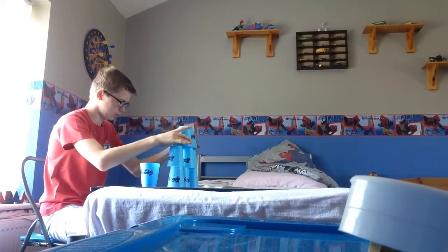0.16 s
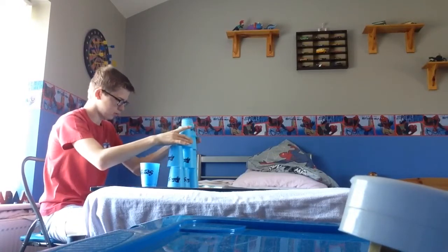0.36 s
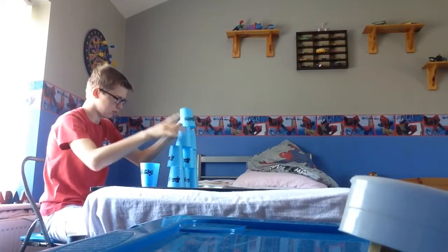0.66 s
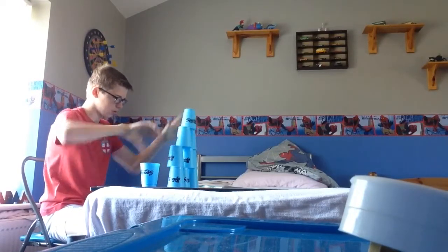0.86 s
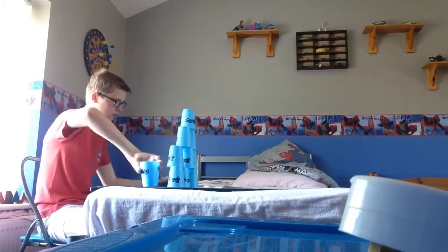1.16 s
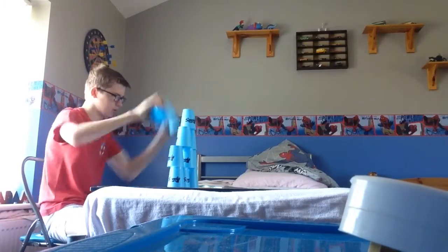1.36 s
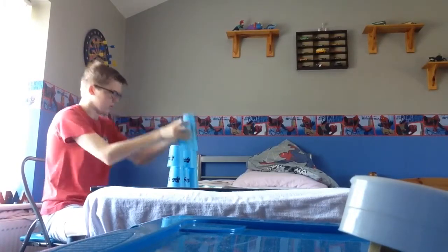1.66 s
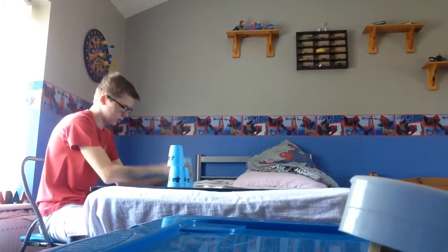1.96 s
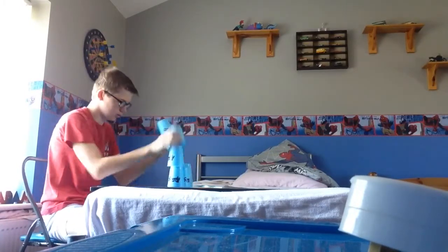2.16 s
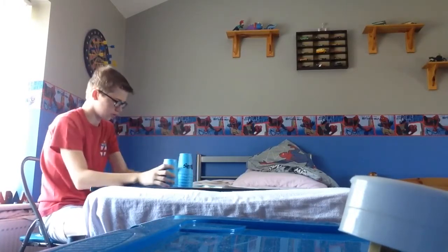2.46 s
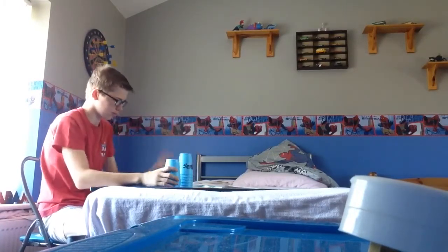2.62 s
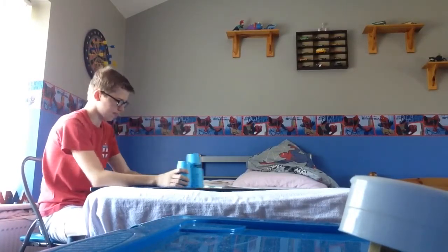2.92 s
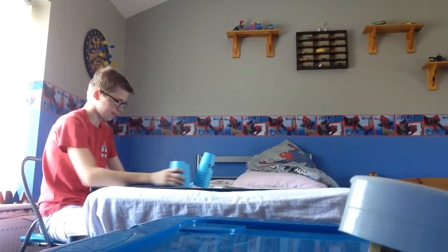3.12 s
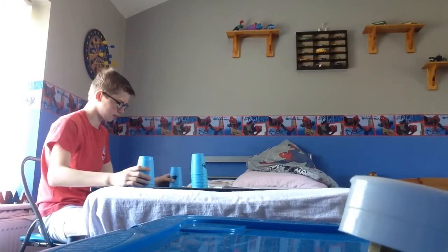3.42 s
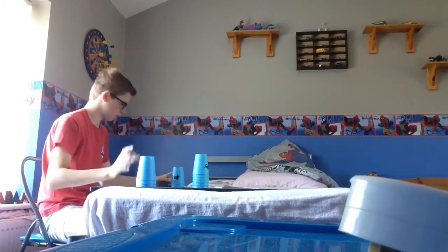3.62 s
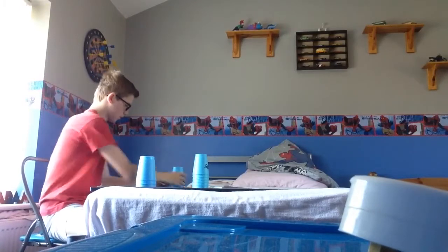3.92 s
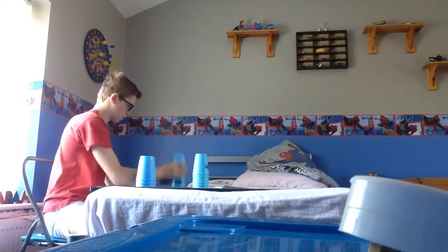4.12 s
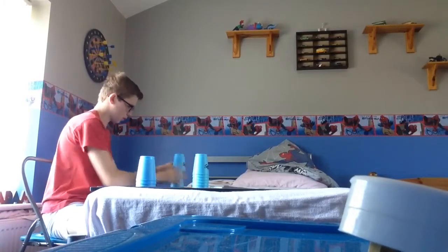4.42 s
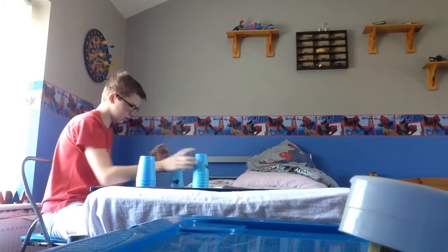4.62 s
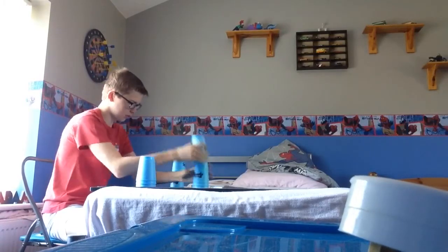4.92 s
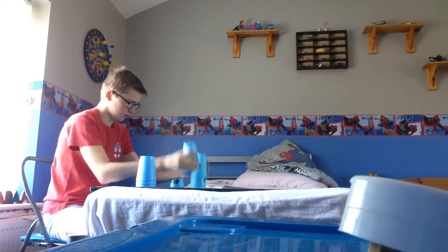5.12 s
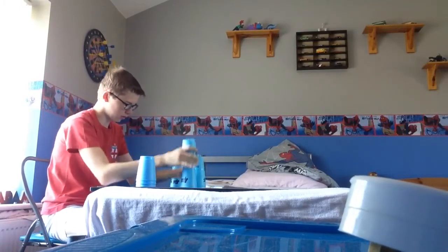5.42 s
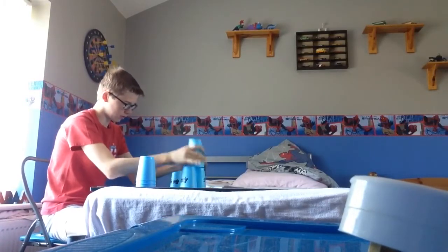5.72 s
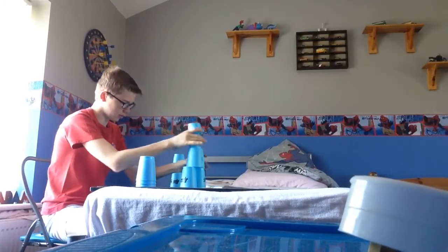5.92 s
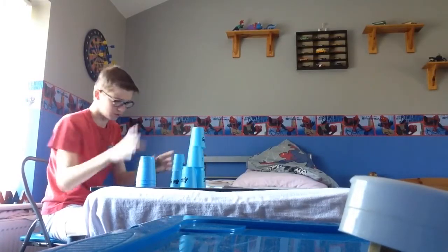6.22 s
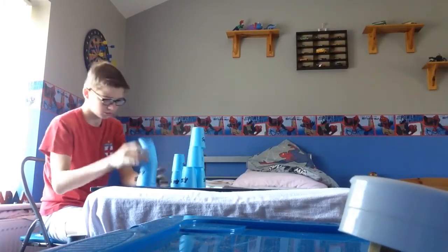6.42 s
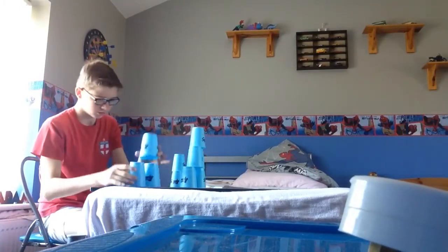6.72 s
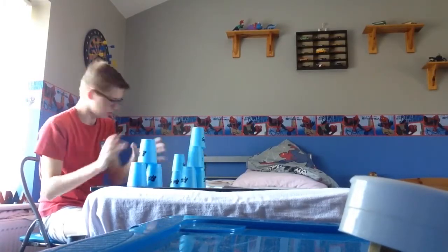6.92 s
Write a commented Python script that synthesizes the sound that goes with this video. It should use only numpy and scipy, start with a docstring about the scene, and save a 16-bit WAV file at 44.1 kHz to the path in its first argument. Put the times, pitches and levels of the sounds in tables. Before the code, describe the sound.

Quick hollow taps and brief sliding clatters of plastic cups being stacked and taken down indoors, with short pauses between.

```python
"""Plastic cups are stacked into pyramids and swept down on a soft-covered board in a small bedroom.
First come separate landings, each a brief chatter that rings the cups and the board. Near 2 s cups slide
and clatter. Around 3 s a dragged stack makes the board hum under soft knocks. From 4 s to the end come
more landings, slides and ticks of rim on rim. All along, the room echoes for a quarter second over a
faint hush, and a phone listens from a couple of metres away."""
import sys
import numpy as np
from scipy import signal
from scipy.fft import rfft, irfft
from scipy.io import wavfile
from scipy.ndimage import uniform_filter1d

SR = 44100
rng = np.random.default_rng(int(sys.argv[2]) if len(sys.argv) > 2 else 0)


def generate_wav(sig):
    """Save sig (samples, or channels by samples) to the path in sys.argv[1] as 16-bit PCM at SR."""
    pcm = np.round(np.clip(np.atleast_2d(sig).T, -1, 1) * 32767).astype(np.int16)
    wavfile.write(sys.argv[1], SR, pcm)


N = 311784


def undb(db):
    """Turn decibels into a number to multiply by."""
    return 10 ** (np.asarray(db) / 20)


def unit(x):
    """Scale a signal so its average size (rms) is 1."""
    return x / np.sqrt(np.mean(x ** 2))


def colour(x, points):
    """Turn lows and highs up or down along a curve of (pitch_hz, level_db) points."""
    hz, db = np.transpose(points)
    f = np.maximum(np.fft.rfftfreq(len(x), 1 / SR), 1)
    return irfft(rfft(x) * undb(np.interp(np.log(f), np.log(hz), db)), len(x))


HUSH_DB, HUSH_WAVER_DB = -65.5, 1.2
# The tone of the background hush: pitch_hz, relative_db
HUSH_TONE = [(15, -47), (25, -19), (122, -3.5), (273, -16.5), (700, -17.5), (1230, -29.5), (2680, -32),
             (3810, -32.5), (4470, -34.5), (7870, -39), (13800, -50.5), (15400, -48)]


def hush():
    """Still air and microphone noise, wavering a little."""
    waver = unit(uniform_filter1d(rng.standard_normal(N), SR // 5))
    return unit(colour(rng.standard_normal(N), HUSH_TONE)) * undb(HUSH_DB + HUSH_WAVER_DB * waver)


ECHO_DB, ECHO_RISE_S = 1.5, 0.013
# How long the room's echo takes to fade by 60 dB: pitch_hz, fade_s
ECHO_FADES = [(125, 0.24), (400, 0.2), (1100, 0.3), (3000, 0.28), (8000, 0.27)]


def room(sound):
    """The walls send back a blur of echoes; each range of pitch fades at its own speed."""
    t, tail = np.arange(SR // 2) / SR, 0
    hz, fade_s = np.transpose(ECHO_FADES)
    noise = rfft(rng.standard_normal(len(t)))
    log_hz = np.log(np.maximum(np.fft.rfftfreq(len(t), 1 / SR), 1))
    for k in range(len(hz)):
        band = np.interp(log_hz, np.log(hz), np.arange(len(hz)) == k)
        fade = 1000. ** (-t / fade_s[k])
        tail = tail + irfft(noise * band, len(t)) * fade / np.sqrt(np.sum(fade ** 2))
    return undb(ECHO_DB) * signal.fftconvolve(sound, tail * np.clip(t / ECHO_RISE_S, 0, 1))[:N]


# Swells of hum from the board: middle_s, pitch_hz, level_db, half_length_s
HUM_SWELLS = [(2.827, 190, -47.5, 0.0058), (2.964, 180, -46.5, 0.009), (3.012, 175, -44.5, 0.024),
              (3.262, 163, -44.5, .016), (3.308, 168, -42.5, 0.0037), (3.365, 168, -46.5, 0.024),
              (3.506, 165, -44.5, 0.01), (3.53, 168, -43, 0.021)]


def board_hum():
    """The rims of a dragged stack rub the board into one low note, with a weak note an octave up."""
    out, t = np.zeros(N), np.arange(-SR // 8, SR // 8) / SR
    for middle_s, hz, db, half_length_s in HUM_SWELLS:
        phase = 2 * np.pi * hz * (t + middle_s)
        note = np.sin(phase) + undb(-23) * np.sin(2 * phase)
        swell = np.exp(-(t / half_length_s) ** 2 / 2)
        start = int(middle_s * SR) - SR // 8
        out[start:start + len(t) - 1] += (undb(db) * swell * note)[1:]
    return np.sqrt(2) * out


RIM_BAND_HZ, RIM_RISE_S, RIM_FADE_S = (2800, 8300), 0.0023, 0.019
# Lone ticks of rim on rim: start_s, peak_db
RIM_TICKS = [(2.0896, -58.5), (2.244, -46), (2.3156, -41.5), (2.4299, -37), (2.904, -46), (4.1138, -52),
             (4.2685, -46.5), (4.843, -55), (4.9046, -51.5), (5.0044, -58.5), (5.1678, -60.5),
             (5.238, -35.5), (5.5304, -43), (6.7568, -48.5), (6.77, -47.5)]


def rim_ticks():
    """A short bright crack where two rims touch."""
    out, t = np.zeros(N), np.arange(SR // 20) / SR
    bright = signal.butter(2, RIM_BAND_HZ, "bandpass", fs=SR, output="sos")
    shape = (1 - np.exp(-t / RIM_RISE_S)) * 1000. ** (-t / RIM_FADE_S)
    for start_s, db in RIM_TICKS:
        crack = signal.sosfilt(bright, rng.standard_normal(len(t))) * shape
        start = int(start_s * SR)
        out[start:start + len(t)] += crack * undb(db) / np.abs(crack).max()
    return out


SLIDE_RISE_S, SLIDE_FALL_S = 0.085, 0.089
SLIPS_PER_S, SLIP_SPREAD_DB, LUMPS_PER_S, LUMP_DB = 3000, 1.6, 45, 2.5
SCRAPE_WIDTH_HZ, SCRAPE_DB, SCRAPE_CLIMB_HZ_PER_S = 350, 2, 2500
# The tone of a sliding cup's hiss: pitch_hz, relative_db
HISS_TONE = [(1470, -6), (2500, -16), (3240, -10.5), (3660, -12.5), (4390, -7.5), (6130, -11.5),
             (15400, -32)]
# Cups sliding on each other and on the cover: start_s, length_s, ring_db, scrape_db, hiss_db, scrape_hz
CUP_SLIDES = [(1.168, .12, -60.5, -77.5, -74, 2300), (1.656, .2, -36, -45.5, -46.5, 2310),
              (2.044, 0.09, -60.5, -79, -73, 2250), (2.28, 0.15, -47.5, -60.5, -56.5, 2570),
              (2.656, 0.156, -74, -73.5, -70.5, 2430), (2.87, .1, -62, -69, -68, 2300),
              (3.222, 0.3, -83, -77, -69.5, 2594), (3.644, 0.11, -79.5, -81.5, -88, 2138),
              (4.024, 0.16, -71, -77, -73, 2500), (4.833, 0.15, -71.5, -79, -84, 2320),
              (4.997, .11, -75, -82, -80, 2440), (6.349, 0.25, -63.5, -70.5, -68, 2355),
              (6.556, 0.12, -66, -69, -73.5, 2350), (6.758, 0.023, -56, -67, -69, 2400)]


def cup_slides():
    """Many tiny slips shake the cups and hiss; the scrape climbs in pitch as one cup enters another."""
    start_s, length_s, *levels_db, start_hz = np.transpose(CUP_SLIDES)[:, :, None]
    age_s = np.arange(N) / SR - start_s
    rise = np.clip(1 + age_s / SLIDE_RISE_S, 0, 1) ** 2
    fall = np.clip(1 - (age_s - length_s) / SLIDE_FALL_S, 0, 1) ** 2
    shape = rise * fall
    ring_gain, scrape_gain, hiss_gain = (np.sum(shape * undb(db), axis=0) for db in levels_db)
    pitches = start_hz + SCRAPE_CLIMB_HZ_PER_S * np.clip(age_s, 0, length_s)
    scrape_hz = pitches[shape.argmax(axis=0), np.arange(N)]  # follow the slide most fully under way

    lumps = undb(LUMP_DB * unit(uniform_filter1d(rng.standard_normal(N), int(SR / LUMPS_PER_S))))
    slips = (rng.random(N) < SLIPS_PER_S / SR) * rng.standard_normal(N)
    slips *= undb(SLIP_SPREAD_DB * rng.exponential(size=N)) * lumps
    t = np.arange(SR // 8) / SR
    held_rings = [ring(notes, t) * np.exp(-t / 0.028) for notes in RING_NOTES]  # muffled by the hand
    low, _, middle, high, clack = (unit(signal.fftconvolve(slips, r)[:N]) for r in held_rings)
    body = unit(low + middle + undb(-11) * high)
    roughness = signal.sosfilt(signal.butter(2, SCRAPE_WIDTH_HZ / 2, fs=SR, output="sos"), slips)
    rough_note = unit(roughness * np.sin(2 * np.pi * np.cumsum(scrape_hz) / SR))
    scrape = unit(clack + undb(SCRAPE_DB) * rough_note)
    hiss = unit(colour(unit(slips) * undb(0.5) + rng.standard_normal(N), HISS_TONE))
    return ring_gain * body + scrape_gain * scrape + hiss_gain * hiss


RING_RISE_CYCLES = 0.41
# The notes that cups and board ring at, in five groups (low, board, middle, high, clack).
# Each note: pitch_hz, relative_db, fade_s (time to fall by 60 dB)
RING_NOTES = [
    [(299.8, -3, 0.024), (355.7, -2.5, 0.059), (417, -0.5, 0.032), (477.6, -5.5, 0.034)],
    [(56, -31.5, 0.49), (82, -16, 0.23), (115, -15.5, 0.16), (135.7, -1, 0.11), (180.8, 7, 0.04),
     (191, -6.5, 0.18)],
    [(555.8, -4.5, 0.052), (630, -2, 0.057), (741.6, 1, 0.025), (780, -2.5, 0.028)],
    [(866, -8, 0.11), (859, -1, 0.06), (975, 8, 0.016), (1054, -4.5, 0.012)],
    [(1180, 0, .02), (1340, 0, .02), (1540, 1, .025), (1730, 0, .015), (1960, 0, .02), (2190, 0, .012),
     (2450, 0, .012), (2750, 0, .01), (3050, 0, .01), (3450, -2, .008)],
]


def ring(notes, t, scatter_db=0, detune=0):
    """One group of notes rings after a soft push; neighbours start by swinging opposite ways."""
    hz, db, fade_s = np.transpose(notes)[:, :, None]
    hz = hz * (1 + detune)
    gain = undb(db + scatter_db) * (-1) ** np.arange(len(hz))[:, None]
    swell = 1 - np.exp(-t * hz / RING_RISE_CYCLES)
    return np.sum(gain * swell * np.sin(2 * np.pi * hz * t) * 1000. ** (-t / fade_s), axis=0)


def rocking_rim(count=24, typical_s=0.03):
    """A rim never lands flat: it rocks through small taps that build up and then die out."""
    length_s = typical_s * (1 + 0.12 * rng.standard_normal())
    samples = max(length_s, 0.002) * SR
    when, size = np.sort(rng.random(count)), rng.standard_normal(count)
    size[0] = 2.3  # the first edge always strikes firmly
    force = (size + np.sign(size)) * (0.19 + 3 * when) * np.exp(-4 * when)
    taps = np.zeros(int(samples) + 2)
    taps[((when - when[0]) * samples).astype(int)] = force
    return taps


NOTE_SCATTER_DB, NOTE_DETUNE, CLACK_REACH_OCTAVES = 3, 0.03, 0.6
CLICK_BAND_HZ, CLICK_FADE_S, CLICK_BELOW_CLACK_DB = (2800, 6430), 0.025, 12.5
# Cups landing: start_s, level_db, board_db, middle_db, high_db, clack_db, clack_hz
# level_db is the peak of the low ring; the other four levels are added to it.
CUP_LANDINGS = [(0.085, -23.5, -51, -3, -5.5, -11.5, 1330), (0.232, -29, -13, -5.5, 1.5, -9, 1360),
                (0.432, -39.5, -16, -7, 1, -13, 1190), (0.761, -25, -15.5, -7.5, 3, -11, 1330),
                (0.836, -36, -46, -7, -0.5, -14, 1550), (1.003, -40, -14.5, -6.5, 0.5, -13, 1590),
                (1.142, -51.5, 3, -21, -36, -15, 1710), (1.228, -36.5, -8, -24, -13, -28, 2090),
                (1.548, -57.5, 6, -11, -19, -6, 1930), (1.606, -21.5, -12, -4, 5, -5.5, 1580),
                (1.885, -18.5, -5, 1.5, -5.5, 2, 1830), (1.917, -26, -4, 1, -17, 6, 1860),
                (1.942, -27.5, -2, 1.5, -5.5, -1.5, 1830), (2.09, -52.5, 4, -14, -4, -12, 1530),
                (2.244, -46, -14, -5, -3, -25, 2500), (2.321, -32.5, -25, -4, -20, -12, 1280),
                (2.348, -24.5, -15, -4, -10.5, -11.5, 2000), (2.374, -23.5, -2, -8.5, -18, 1.5, 1520),
                (2.398, -29, 5, -11, -4.5, -2, 1500), (2.427, -24, 2, -16, -36, -4.5, 1720),
                (2.817, -56, 3, -9, -1, -8, 1205), (2.842, -50, 10, -9, -13, -3, 1200),
                (2.874, -39, -1, -15, -39, -13, 1250), (2.907, -38, -12, -14, -15, -7.5, 1180),
                (2.937, -51, 4.5, 0.5, -9, -2, 1190), (3.045, -46, 12, -8, -8.5, -4.5, 1200),
                (3.425, -49.5, 15, -6, -9, -2, 1214), (3.586, -56.5, 13, -9.5, -3.5, 0, 1234),
                (3.999, -56.5, -2, 2, 4.5, 7, 1340), (4.021, -53, -15, 2.5, -11, 7, 1300),
                (4.094, -49.5, -2, -5, -12, -10, 1360), (4.248, -33, -14, -12.5, -42, -22, 2070),
                (4.269, -41, -21, -8, -29, -10.5, 3300), (4.294, -46.5, -0.5, 2, -24, -14.5, 2190),
                (4.314, -42.5, -4, 0, -28, -16.5, 2120), (4.419, -21.5, -17.5, 2.5, 0.5, -3, 1540),
                (4.79, -51.5, -0.5, -5, -14, -12, 1320), (4.843, -53.5, 6, -4, -18, -2, 2060),
                (4.873, -47.5, -1, -11, -25, -12, 2100), (4.911, -43, -5, -5, -28, -12.5, 1200),
                (5.009, -45.5, 3, -7, -12, -13, 1210), (5.167, -53, -17, -0.5, -26, -14, 3060),
                (5.23, -17.5, -12, -1.5, -19.5, -13, 2230), (5.41, -38, -11, -18, -23, -26, 1380),
                (5.522, -18.5, -10.5, -2.5, -15.5, -10.5, 2800), (5.648, -25, -13, 0.5, -8, -7, 1480),
                (5.812, -34, -9, 2, -8, -11, 1210), (5.82, -29.5, -9.5, 1.5, 2, -4.5, 1300),
                (5.848, -30.5, -32, 1, 2.5, -8, 1520), (6.027, -21, -21, -12, -7.5, -11.5, 1210),
                (6.042, -26, -23, -2.5, -4, -8.5, 1380), (6.373, -39.5, 1.5, -13, -34, -13, 1235),
                (6.406, -49, -5, -10, -11, 6, 1237), (6.497, -48, 2.5, -6, 1.5, 6.5, 1400),
                (6.699, -39.5, -10.5, -23, -45, -38, 2380), (6.774, -29, -13.5, -5.5, -21, -17, 2440),
                (6.842, -27.5, -14.5, 2.5, 3.5, -6.5, 1220), (6.86, -36, -9, 2, 3, -33, 1430)]


def cup_landings():
    """Rim taps ring the cups and board. Returns the sound sent to the phone and that sent all around."""
    direct, spread = np.zeros((2, N + SR))
    t = np.arange(SR // 7) / SR
    bright = signal.butter(2, CLICK_BAND_HZ, "bandpass", fs=SR, output="sos")
    clean_click = signal.sosfilt(bright, 1. * (t == 0))
    wall_hz = np.array(RING_NOTES[-1])[:, :1]
    for start_s, level_db, board_db, middle_db, high_db, clack_db, clack_hz in CUP_LANDINGS:
        click_db = clack_db - CLICK_BELOW_CLACK_DB
        levels_db = level_db + np.array([0, board_db, middle_db, high_db, clack_db, click_db])
        taps = rocking_rim()
        chance = [rng.standard_normal((2, len(notes), 1)) for notes in RING_NOTES]
        scatter_db = [NOTE_SCATTER_DB * draw[0] for draw in chance]
        detune = [NOTE_DETUNE * draw[1] for draw in chance]
        # where the cup is hit favours the wall notes near its clack pitch
        scatter_db[-1] -= 6 * (np.log2(wall_hz / clack_hz) / CLACK_REACH_OCTAVES) ** 2
        rings = [ring(notes, t, db, shift) for notes, db, shift in zip(RING_NOTES, scatter_db, detune)]
        parts = [signal.fftconvolve(taps, r) for r in rings]
        # the heavy board feels only the early taps, summed into one push
        parts[1] = signal.fftconvolve(np.abs(taps[:len(taps) // 5]), rings[1])
        click = signal.sosfilt(bright, rng.standard_normal(len(t))) * 1000. ** (-t / CLICK_FADE_S)
        parts.append(signal.fftconvolve(taps, click))
        start = int(start_s * SR)
        for part, one_tap, db in zip(parts, rings + [clean_click], levels_db):
            part = part * undb(db) / np.abs(part).max()
            direct[start:start + len(part)] += part
            # over all directions the taps blend into one clean ring with the same energy
            spread[start:start + len(t)] += one_tap * np.sqrt(np.sum(part ** 2) / np.sum(one_tap ** 2))
    return direct[:N], spread[:N]


def scene():
    """Cups heard directly and as a room echo, over the board's hum and the hush."""
    direct, spread = cup_landings()
    handling = cup_slides() + rim_ticks()
    return (direct + handling + room(spread + handling) + board_hum() + hush())[None]


def record(dry, low_hz=42.8, top_hz=15200):
    """The phone drops the deep bass and cuts the highest treble."""
    thin = signal.sosfilt(signal.butter(2, low_hz, "highpass", fs=SR, output="sos"), dry)
    return signal.sosfilt(signal.ellip(8, .2, 70, top_hz, fs=SR, output="sos"), thin)


dry = scene()
out = record(dry)
generate_wav(out)
```